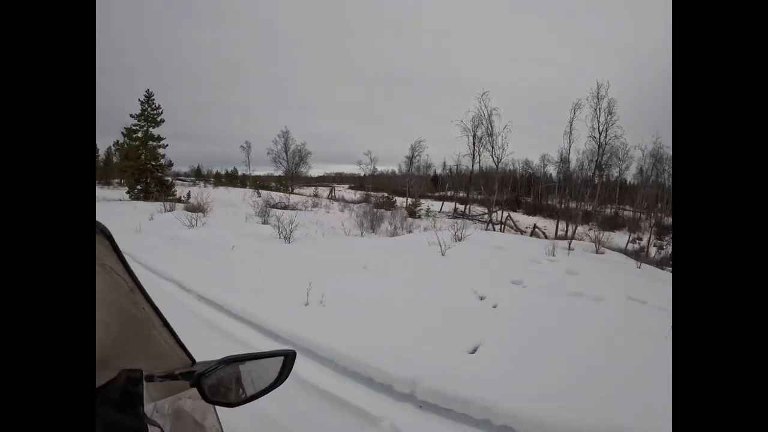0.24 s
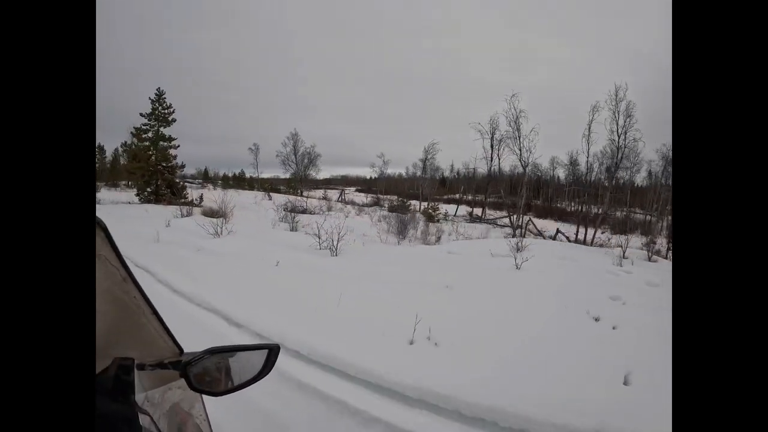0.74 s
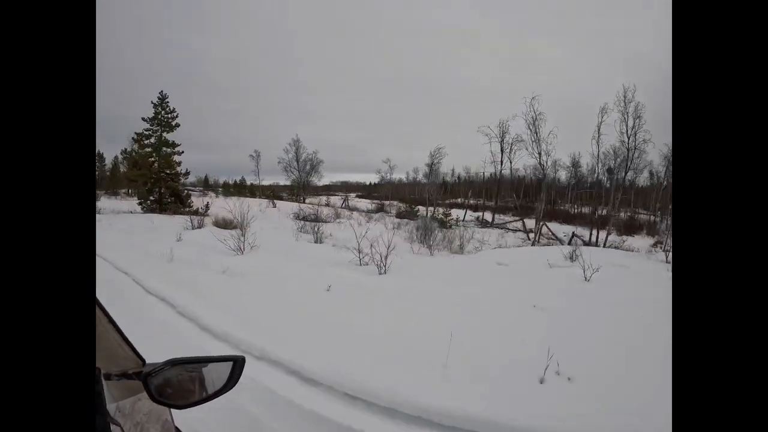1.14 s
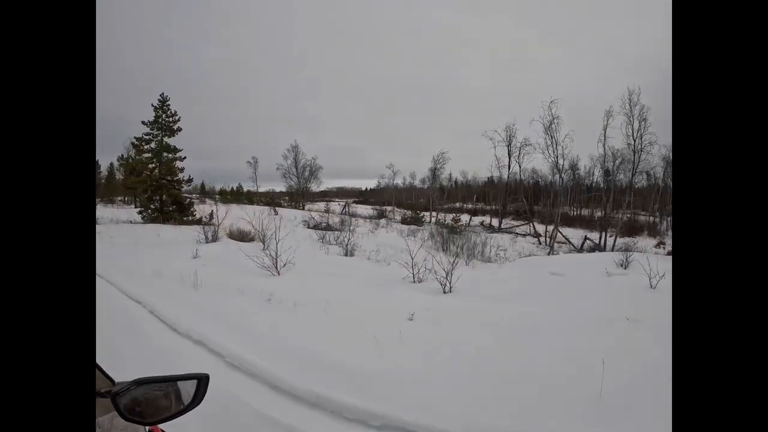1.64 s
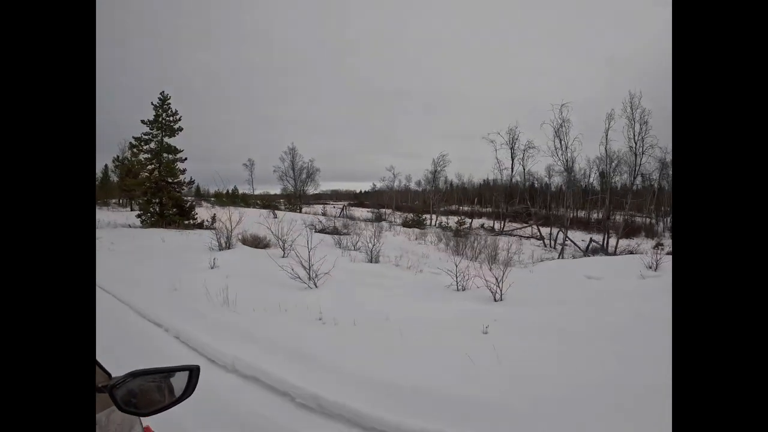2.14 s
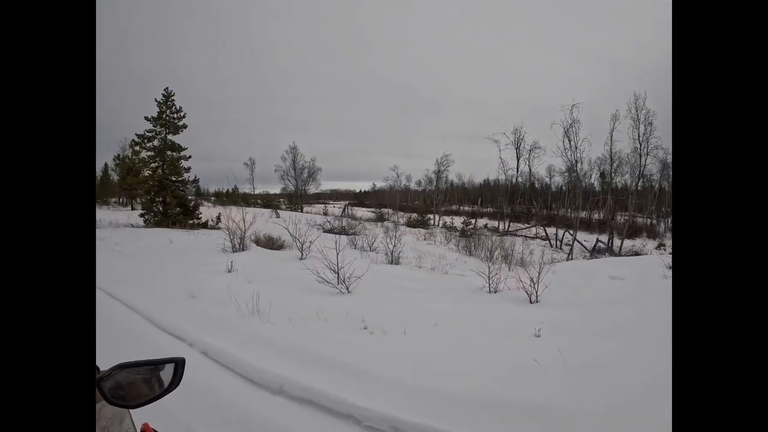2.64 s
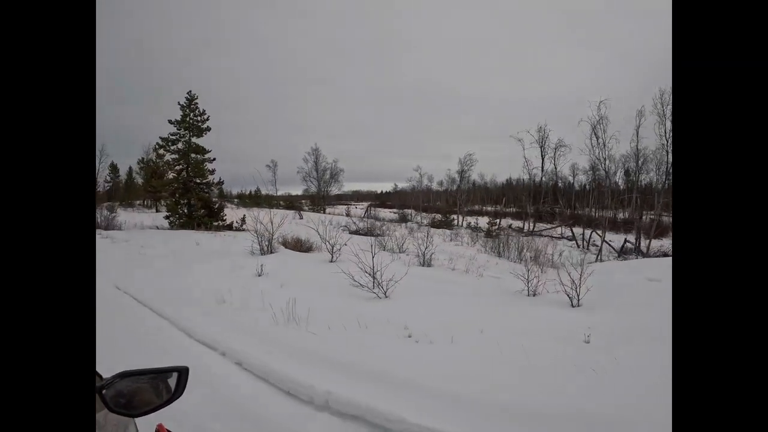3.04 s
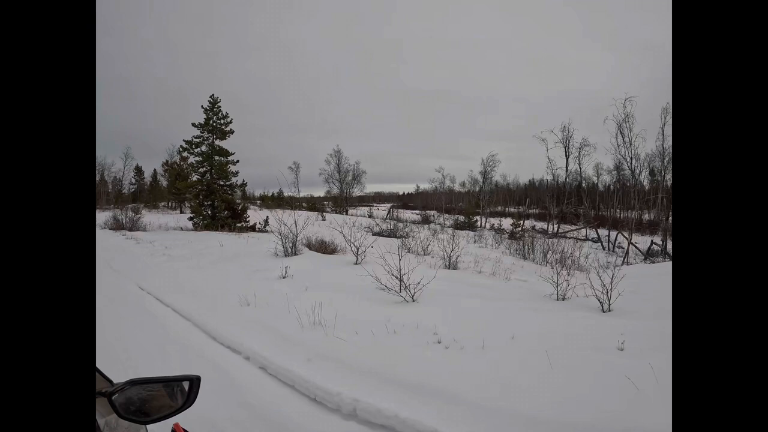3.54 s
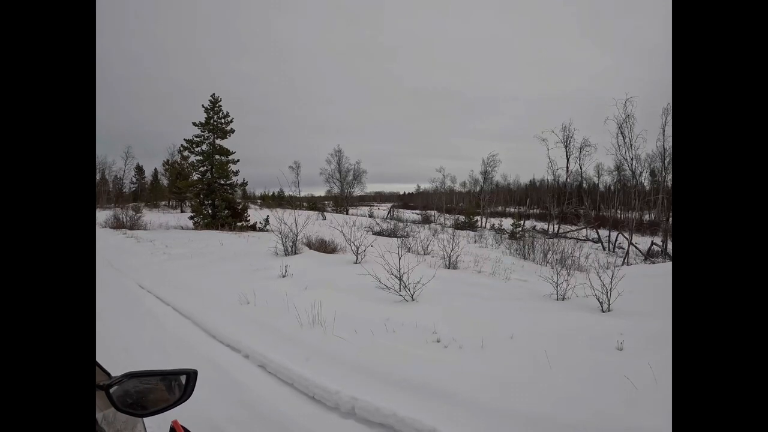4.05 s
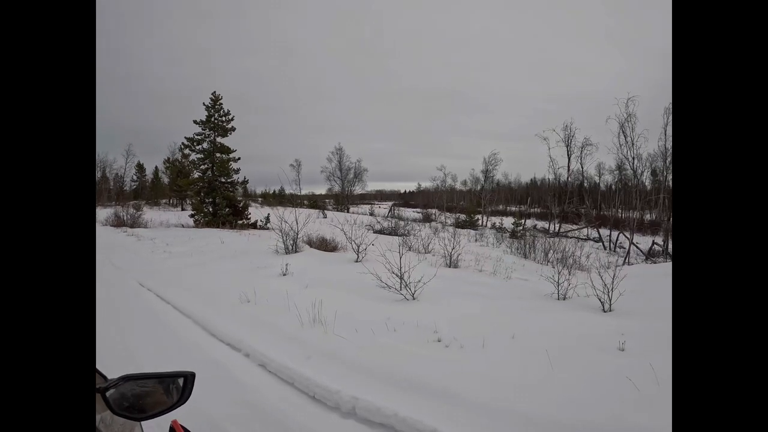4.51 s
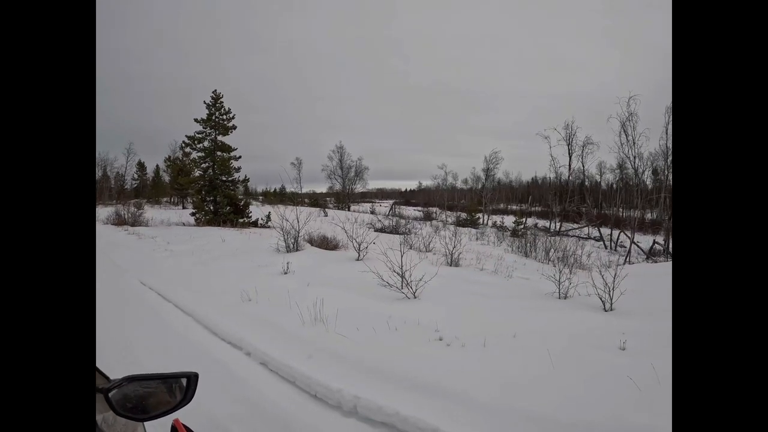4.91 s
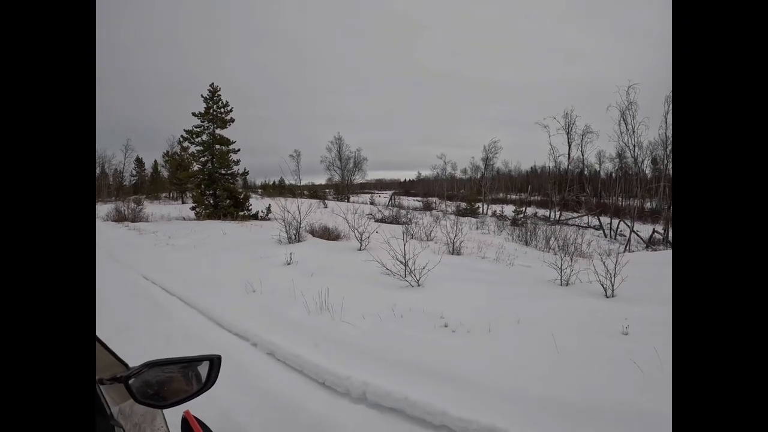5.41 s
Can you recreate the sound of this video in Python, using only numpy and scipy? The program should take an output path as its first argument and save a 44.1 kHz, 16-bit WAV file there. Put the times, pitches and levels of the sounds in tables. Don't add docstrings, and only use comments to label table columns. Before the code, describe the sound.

A snowmobile's raspy engine rises slightly, then its pitch falls as the throttle closes, with brief low wind buffeting. It settles into uneven chugging with block knocks and metallic clatter. A plastic switch clicks; the crank turns over ever more slowly, shaking small parts, and nearly silent outdoor air remains. The microphones are close, worn or mounted at the seat, dry with no echo.

```python
import sys
import numpy as np
from scipy import signal
from scipy.io import wavfile
from scipy.ndimage import uniform_filter1d

SR = 44100
rng = np.random.default_rng(int(sys.argv[2]) if len(sys.argv) > 2 else 0)


def attenuation_scalar(level_db):
    decades = np.asarray(level_db, float) / 20
    return 10 ** decades


def dump(signal):
    limited = np.clip(np.atleast_2d(signal).T, -1, 1)
    pcm = np.round(limited * 32767).astype(np.int16)
    wavfile.write(sys.argv[1], SR, pcm)


N = 250047
CUT_S = 4.806
IDLE_SPEED = 21
OPPOSITE = np.array([[1], [-1]])


def in_time(rows):
    s, *columns = np.transpose(rows)
    return [np.interp(np.arange(N) / SR, s, c) for c in columns]


def at_hz(points, hz):
    table_hz, values = np.transpose(points)
    return np.interp(np.log(hz), np.log(table_hz), values)


def rms_one(x):
    return x / np.sqrt(np.mean(x ** 2) + 1e-20)


def pan(left_db, right_db):
    return attenuation_scalar([[left_db], [right_db]])


def butter(x, hz, kind, order=2):
    return signal.sosfilt(signal.butter(order, hz, kind, fs=SR, output="sos"), x)


def drift(rate):
    r = np.exp(-80 * np.pi * rate / SR)
    slow = signal.lfilter([1], [1, -2 * r, r * r], rng.standard_normal(N // 40 + 2002))[2000:]
    return np.interp(np.arange(N) / 40, np.arange(len(slow)), rms_one(slow))


def resonate(x, modes):
    out = 0
    for k, (hz, width, db) in enumerate(modes):
        r = np.exp(-np.pi * width / SR)
        poles = [1, -2 * r * np.cos(2 * np.pi * hz / SR), r * r]
        zeros = np.array([1, 0, -1]) * (1 - r * r) / 2
        out = out + (-1) ** k * attenuation_scalar(db) * signal.lfilter(zeros, poles, x + 1e-18)
    return out


def swells(rows):
    t = np.arange(N, dtype=np.float32) / SR
    return sum(top * np.exp(-np.minimum(((t - s) / half) ** 2, 60)) for s, half, top in rows)


def loud_swells(rows, rest_db):
    return attenuation_scalar(rest_db) + swells([(s, half, attenuation_scalar(db)) for s, half, db in rows])


def place(out, s, sound):
    part = out[:, round(s * SR):][:, :sound.shape[1]]
    part += sound[:, :part.shape[1]]


def dead_s():
    return np.maximum(np.arange(N) / SR - CUT_S, 0)


def firing_speed():
    # (time [s], speed [turns per s])
    crank = [(0, 53.8), (.35, 53.8), (.52, 57.6), (.7, 58.8), (.99, 56.8), (1.15, 48.6), (1.3, 45.2),
             (1.66, 40.8), (1.82, 36.6), (2.13, 33.1), (2.33, 29.5), (2.78, 23.5), (3.15, 21.0),
             (3.57, 20.8), (3.7, 20.3), (4.04, 20.4), (4.16, 21.0), (4.82, 20.6)]
    return in_time(crank)[0]


def crank_turns():
    # (time [s], angle [turns])
    run_out = [(4.806, 0), (4.855, 1), (4.882, 1.5), (4.915, 2), (4.984, 3), (5.072, 4), (5.128, 4.5),
               (5.192, 5), (5.277, 5.5), (5.394, 6), (5.536, 6.5), (5.75, 7)]
    turns = np.cumsum(firing_speed() * (1 + 0.0025 * drift(9.3))) / SR
    return np.where(dead_s() > 0, in_time(run_out)[0], turns - turns[round(CUT_S * SR)])


def speed_of(turns):
    return uniform_filter1d(np.gradient(turns) * SR, size=800)


def idling():
    return np.clip((24 - firing_speed()) / 3, 0, 1) * (dead_s() == 0)


def coasting_share(load):
    return (1 - idling()) * (1 - load) * (dead_s() == 0)


def kicks(turns):
    kick_s, between_db = 0.045, -6
    away_s = np.abs((2 * turns + .5) % 1 - .5) / 2 / speed_of(turns)
    opened = np.maximum(np.exp(-(away_s / kick_s) ** 3), attenuation_scalar(between_db))
    return np.where(dead_s() > 0, opened, 1)


def engine(turns):
    # (time [s], load [0-1], exhaust push [dB], imbalance of the cylinders [dB])
    riding = [(0, 0.35, -22.5, 22.5), (.2, 0.16, -31, 29.5), (.4, 0.69, -23, 22), (.8, 0.81, -24.5, -26),
              (.98, 0.97, -22.5, 17), (1.07, 0.98, -34, -5), (1.17, 0.28, -20.5, 7.5),
              (1.55, 0.01, -21.5, 17.5), (1.78, 0.07, -23.5, 12.5), (2.3, 0.08, -24.5, -3),
              (2.7, 0, -24, -8), (3.0, 0.17, -17.5, 3), (4.78, 0.23, -17, -3.5), (4.9, 0.12, -17.5, -18),
              (5.02, 0.05, -19, -1), (5.29, 0.03, -16.5, -26), (5.5, 0.56, -29.5, -11),
              (5.67, 0.2, -43, .3)]
    load, push_db, odd_db = in_time(riding)
    pulses = firings(turns, load, odd_db)
    pipes = exhaust_push(pulses, load, push_db) + intake_bark(pulses)
    return pipes + hood_hum(pulses) + drive_whine(turns) + pipe_crossings(turns)


def firings(turns, load, odd_db):
    order_db = [-20, -2.5, 9.5, -19.5, 7.5, -1, -30, 10, 10, 24, -22.5, 13]
    coasting_db = {10: -0.5, 12: 1.5, 14: 4.1}
    idle_odd_db = -27
    compression_hz, spark_dies_s = 313, 0.23
    even_db, part_load_db = 1.36, -0.4

    speed, pulses = speed_of(turns), 0
    top_order = np.maximum(120 * np.exp(-dead_s() / spark_dies_s), np.minimum(compression_hz / speed, 34))
    spread_db = (even_db + part_load_db * 4 * load * (1 - load)) * (dead_s() == 0)
    wander = [.9 * (1 - idling()) * (1 - .7 * load) * drift(8) for _ in range(5)]
    coasting = coasting_share(load)
    for k in range(1, 35):
        pull_db = order_db[min(k, len(order_db)) - 1]
        db = load * pull_db + (1 - load) * (idle_odd_db + odd_db) * (k % 2)
        db = db + coasting_db.get(k, 0) * coasting
        phase = 2 * np.pi * k * turns + (wander[k % 5] if k > 4 else 0)
        pulses = pulses + attenuation_scalar(db) * np.exp(-(k / top_order) ** 2) * np.cos(phase)
    strength = np.interp((2 * turns) % 599, np.arange(600), rng.standard_normal(600))
    return pulses * np.sqrt(2) * speed / 21 * attenuation_scalar(spread_db * strength)


def exhaust_push(pulses, load, push_db):
    # (frequency [Hz], width [Hz], level [dB])
    exhaust_modes = [(43.5, 40, -3.5), (73, 15.5, 2.5), (113.3, 14.7, -1.3)]
    # (frequency [Hz], width [Hz], level [dB])
    side_pipe = [(148.4, 24.6, -11)]
    frame_db = push_db - 3.5 * idling() + 2 * dead_s()
    frame = resonate(pulses * attenuation_scalar(frame_db), [(68.6, 6.6, 2.65)])
    push = butter(resonate(pulses * attenuation_scalar(push_db), exhaust_modes) - frame, 167, "low")
    return push - resonate(pulses * attenuation_scalar(push_db) * coasting_share(load), side_pipe)


def intake_bark(pulses):
    # (frequency [Hz], width [Hz], level [dB])
    intake_modes = [(196.7, 83, -11.5), (197.5, 116, -10), (296.7, 28, -6), (332.3, 14.8, -10.5),
                    (389.3, 49.7, -13.5), (470.3, 28.4, -16.5)]
    # (time [s], half length [s], level [dB])
    throttle_shut = [
        (1.12, 0.2, -6),
        (2.25, .22, -6),
    ]
    lead_s, fade_db_per_s = .0019, 50
    bark_db = -24.5 + swells(throttle_shut) - fade_db_per_s * np.maximum(dead_s() - .2, 0)
    early = np.roll(pulses, -round(lead_s * SR))
    bark = butter(resonate(-early * attenuation_scalar(bark_db), intake_modes), 550, "low", order=6)
    return bark * pan(-0.47, 0.47)


def hood_hum(pulses):
    # (time [s], half length [s], level [dB])
    low_panel = [
        (.14, 0.12, -35.5),
        (.36, 0.12, -40.5),
        (1.27, 0.18, -38),
    ]
    hood = [(645, 60, 0)]
    driven = pulses * loud_swells(low_panel, -75)
    return resonate(resonate(driven, hood), hood) * pan(-9.0, -13.0)


def drive_whine(turns):
    # (crank order [1], level [dB])
    drive_tones = [(3, -27), (16, -43), (18, -37.5), (20, -43), (22, -49), (24, -50), (26, -46.5),
                   (30, -57.5), (34, -58), (38, -50.5), (40, -52.5)]
    top_speed, db_per_speed = 59.1, 2
    whine = 0
    for k, db in drive_tones:
        side = pan(4.0, -2.0) if k > 8 else 1
        whine = whine + attenuation_scalar(db + 2.5 * drift(15)) * np.sin(2 * np.pi * k * turns) * side
    below = np.maximum(top_speed - uniform_filter1d(firing_speed(), size=2000), 0)
    return whine * (attenuation_scalar(5 - db_per_speed * below) + attenuation_scalar(-5 - 2.4 * below))


def pipe_crossings(turns):
    # (crank order [1], time [s], half length [s], level [dB])
    order_swells = [(12.06, 1.8, .14, -37), (13.98, 2.07, 0.1, -33), (14, 2.3, .12, -33.5),
                    (5.98, 2.7, 0.15, -32), (15.97, 2.39, 0.087, -33.5), (18, 2.65, 0.089, -34.5),
                    (8, 2.95, 0.11, -34), (22.04, .2, .2, -46), (25.94, .25, 0.22, -48)]
    waver, out = .5 * drift(8), 0
    for k, s, half, db in order_swells:
        tone = np.sqrt(2) * np.sin(2 * np.pi * k * turns + waver)
        out = out + swells([(s, half, attenuation_scalar(db))]) * tone
    return out


def clatter(turns):
    # (frequency [Hz], density [dB per Hz])
    colour = [(280, -31), (480, -1), (531, 2), (677, -5), (1170, 0), (1290, -6), (1490, -9), (2020, -3.5),
              (2170, -12.5), (3430, -16), (5500, -23.5), (7550, -27.5), (14800, -68.5)]
    # (frequency [Hz], left minus right [dB])
    left_db = [(60, 0.0), (110, 0.0), (200, 0.0), (370, -7), (680, 7.5), (1260, 4.5), (2310, 10.5),
               (4250, 0.5), (7810, 7), (14400, 24.5)]
    # (frequency [Hz], likeness [0-1])
    likeness = [(60, 1.0), (130, 1.0), (290, 0.67), (630, 1), (1370, 0.84), (3000, 1), (6570, 0.65),
                (14400, 0.27)]
    # (frequency [Hz], width [Hz], level [dB])
    panel_modes = [(969, 18, -4.5), (1210, 210, -18.5), (1750, 62, -16.5), (2047, 70, -16.5),
                   (2530, 320, -36.5), (3420, 150, -30), (4130, 190, -41), (5030, 120, -38.5)]
    lag_s, full_coast = .003, 14

    speed, late = firing_speed(), turns - lag_s * speed_of(turns)
    coasting = uniform_filter1d(np.clip(-np.gradient(speed) * SR / full_coast, 0, 1), size=9000)
    level_db = -39 + 6 * np.log2(speed_of(turns) / IDLE_SPEED) - 2 * coasting
    level_db = level_db + 1.5 * np.clip((speed - 54) / 3, 0, 1)
    bright_db = 0.6 - 1.14 * coasting + 2.5 * dead_s()

    slow = np.clip((30 - speed) / 9, 0, 1) * np.exp(-dead_s() / .15)
    even = .8 + (.62 - .8) * slow
    burst = .65 + (1.05 - .65) * slow
    stronger = 1 - .5 * np.sin(2 * np.pi * late)
    gate = even + burst * stronger * uniform_filter1d(np.exp(-(2 * late % 1) * 2.5), size=330)

    white, edges, bands = rng.standard_normal((2, 2, N)), 480 * 2 ** np.arange(0, 5.1, .5), 0
    for k, (low, high) in enumerate(zip(edges, edges[1:])):
        hz = np.sqrt(low * high)
        near, apart = butter(white[k % 2], [low, high], "band")
        stray = np.sqrt(np.clip(1 - at_hz(likeness, hz), 0, 1) / 2) * apart * OPPOSITE
        side = attenuation_scalar(at_hz(left_db, hz) / 2 * OPPOSITE)
        dull_db = -2 * slow * (hz < 900)
        gain = attenuation_scalar(at_hz(colour, hz) + bright_db * np.log2(hz / 1200) + dull_db + 0.97 * drift(21))
        bands = bands + gain * (near + stray) * side * gate ** (.9 if hz > 4000 else 1.1)
    panels = resonate(white[0, 0] * gate ** 2 + .3 * white[1], panel_modes) * pan(9.0, 3.5)
    knock = block_knock(late, slow, white[1, 1])
    return attenuation_scalar(level_db) * kicks(turns) * (rms_one(bands + panels) + knock)


def block_knock(late, slow, chance):
    # (frequency [Hz], width [Hz], level [dB])
    block_modes = [(960, 90, -21), (1265, 55, -11), (1720, 120, -23), (2010, 110, -23), (2550, 250, -33),
                   (3450, 250, -35), (4600, 400, -44)]
    apart = 35
    half_turn = np.floor(2 * late - .1)
    blow_db = 58 - 6 * (1 - half_turn % 2) - 6 * (1 - slow) + 1.5 * chance
    blows = (np.diff(half_turn, prepend=half_turn[0]) > 0) * attenuation_scalar(blow_db)
    blows = (blows + np.roll(blows, apart) + np.roll(blows, 2 * apart)) / 2.6
    return resonate(blows * np.exp(-dead_s() / .25), block_modes) * pan(2.5, -3.0)


def chassis(turns):
    # (time [s], half
    # length [s], level [dB], frequency [Hz])
    bumps = [(0, 0.015, -13.5, 61), (0.105, 0.033, -18, 57.7), (0.187, 0.043, -19, 75),
             (0.239, 0.048, -14.5, 54.5), (0.351, 0.033, -17.5, 70), (0.654, 0.026, -27, 56),
             (0.765, 0.027, -21, 78.4), (0.856, .04, -27, 65), (0.971, 0.024, -17, 85),
             (1.054, 0.045, -17, 69.5), (1.153, .04, -18.5, 73), (1.216, .03, -21, 68.4),
             (1.415, 0.06, -30, 58), (1.549, 0.056, -28, 55), (5.402, 0.011, -32, 206),
             (5.43, 0.026, -35.5, 133), (5.515, 0.011, -37, 237), (5.548, 0.0092, -37.5, 171),
             (5.585, .012, -42, 139), (5.55, 0.033, -25.5, 42), (5.621, 0.03, -37, 45.5)]
    t, jolts = np.arange(N) / SR, 0
    for s, half, db, hz in bumps:
        jolts = jolts + np.sqrt(2) * swells([(s, half, attenuation_scalar(db))]) * np.cos(2 * np.pi * hz * (t - s))

    boom = resonate(rng.standard_normal(N), [(29.8, 5.6, 1.5), (63.0, 43.0, 11)])
    boom_db = -40 + 15.5 * np.clip((2 - t) / .4, 0, 1) - 8.2 * dead_s()
    boom = attenuation_scalar(boom_db) * rms_one(butter(boom, 110, "low"))

    drone_db = -33.5 + 6 * np.log2(speed_of(turns) / IDLE_SPEED) + 2.5 * idling()
    drone_db = drone_db + 4 * np.minimum(dead_s() / 0.21, 1)
    unlike = butter(rng.standard_normal(N), 390, "high", order=6) * OPPOSITE
    white = rng.standard_normal(N) + .2 * unlike
    modes = [(30, 21, -22.5), (99, 25, -20.0), (164.0, 97.0, 3.0), (298.0, 60, 2.5), (420, 108, -2.0)]
    drone = rms_one(butter(resonate(white, modes), 441, "low", order=6))
    return jolts + boom + attenuation_scalar(drone_db) * kicks(turns) * drone


def crank_tick(turns):
    swell_speed, speed_range, swell_db = 38.8, 7.8, 9
    angle = turns + .78
    chance = rng.standard_normal(300)[np.floor(angle).astype(int) % 300]
    since_s = (angle % 1) / firing_speed()
    near_speed = np.exp(-((speed_of(turns) - swell_speed) / speed_range) ** 4)
    tick_db = -57 + swell_db * near_speed - 40 * dead_s()
    burst = np.exp(-since_s / .0011) * attenuation_scalar(tick_db + 14 + 1.2 * chance)
    modes = [(3220, 490, 3.5), (6500, 3600, -29.5), (9400, 350, -2.5)]
    near, apart = resonate(rng.standard_normal((2, N)), modes)
    tick = burst * rms_one(near + .5 * apart * OPPOSITE)
    return butter(tick, 8100, "low", order=4) * pan(2.0, -2.0)


def singing_panel():
    # (time [s], half length [s], level [dB])
    high_panel = [
        (.01, .025, -41),
        (.075, .03, -41),
        (.2, .075, -39.5),
        (.55, .12, -45),
        (.9, .17, -45),
        (1.53, .08, -42),
        (1.72, .1, -46),
    ]
    mode = [(1965, 44, 0)]
    whistle = rms_one(resonate(resonate(rng.standard_normal(N), mode), mode))
    return loud_swells(high_panel, -62) * np.exp(-dead_s() / .1) * whistle * pan(3.0, -3.0)


def valve_hiss(turns):
    since_s = (turns + .5) % 1 / IDLE_SPEED
    hiss = rms_one(resonate(rng.standard_normal(N), [(10200, 250, 0)]))
    return attenuation_scalar(-70) * idling() * np.exp(-(since_s / .011) ** 2) * hiss * pan(2.0, -2.0)


def rattle(turns):
    knocks_per_s, rise_s, fade_db_per_s = 700, 0.2, 26
    level = attenuation_scalar(-43 - fade_db_per_s * dead_s()) * np.minimum(dead_s() / rise_s, 1) * kicks(turns)
    strength = attenuation_scalar(4.0 * np.minimum(rng.exponential(size=N), 2.5))
    knocks = (rng.random(N) < knocks_per_s / SR) * strength * level
    dealt, pitches = rng.integers(0, 12, N), np.geomspace(700, 3400, 12)
    rings = sum(resonate(knocks * (dealt == k), [(hz, 260, 30)]) for k, hz in enumerate(pitches))
    return butter(rings, 3500, "low") * pan(2.5, -2.5)


def switch_click():
    # (time [s], peak level [dB])
    snaps = [
        (4.7864, -26),
        (4.7875, -12),
        (4.7894, -19.5),
        (4.7908, -13.5),
    ]
    # (frequency [Hz], width [Hz], level [dB])
    case_modes = [(1080, 190, 0.5), (1314, 250, -3), (1640, 210, 1.5), (2130, 120, 4), (2500, 240, 0),
                  (3300, 280, 1), (3900, 260, 1), (4730, 500, -4.5), (6100, 390, -4), (7000, 1100, -8.5),
                  (9400, 1300, -21)]
    out, t = np.zeros((2, N)), np.arange(4000) / SR
    for s, db in snaps:
        snap = resonate(rng.standard_normal(4000) * np.exp(-t / .0005), case_modes)
        place(out, s, attenuation_scalar(db) * snap / np.abs(snap).max() * pan(2.0, -2.0))
    return out


def metal_clinks():
    # (time [s], peak level [dB], frequency [Hz], left minus right [dB])
    clinks = [(4.93, -42, 2350, 4), (4.967, -34, 1410, 6), (5.052, -40, 2230, 6), (5.285, -44, 3150, 4),
              (5.314, -46, 1400, 3), (4.964, -23, 300, 0), (5.004, -39, 1650, 6), (5.008, -40, 2250, 6),
              (5.092, -36, 1570, 7), (5.172, -36, 950, 6), (5.14, -41, 2200, 6), (5.205, -42, 2100, 6),
              (5.254, -40, 1100, 6), (5.29, -42, 1800, 5), (5.228, -42, 1600, 6), (5.272, -48, 3150, 4),
              (5.364, -45, 1280, 4), (5.438, -53, 1030, 5), (5.368, -48, 2070, 15), (5.395, -42, 2000, 5),
              (5.414, -45, 2780, 8), (5.545, -47, 2260, 8), (5.547, -50, 1350, 5), (5.576, -51, 1040, -11),
              (5.619, -51, 2180, 9), (5.622, -50, 1160, 5)]
    # (time [s], peak level [dB])
    ring_touches = [
        (5.007, -35),
        (5.05, -49),
        (5.098, -39),
        (5.155, -37),
        (5.226, -36),
        (5.252, -50),
        (5.366, -48),
    ]
    bounce_s, bounce_db, bounce_hz = .007, -11, 60
    touches = [(s + k * bounce_s, db + 3.5 + k * bounce_db, 4025 + k * bounce_hz, 3.2)
               for s, db in ring_touches for k in range(2)]
    out, t = np.zeros((2, N)), np.arange(4000) / SR
    for s, db, hz, pan_db in clinks + touches:
        clink = np.sin(2 * np.pi * hz * t) * np.exp(-t / 0.0056) * np.minimum(t / 0.004, 1)
        place(out, s, attenuation_scalar(db) * clink * pan(pan_db / 2, -pan_db / 2))
    return out


def cloth_scuffs():
    # (time [s], level [dB], length [s])
    rubs = [
        (4.986, -58, 0.015),
        (5.216, -53.5, 0.011),
        (5.242, -51, 0.034),
        (5.362, -63, 0.026),
        (5.398, -54, 0.012),
        (5.479, -42.5, 0.0095),
        (5.49, -43, 0.039),
        (5.578, -60, 0.21),
    ]
    out, t = np.zeros((2, N)), np.arange(4000) / SR
    for s, db, length in rubs:
        mid, side = butter(rng.standard_normal((2, 4000)), [400, 8000], "band", order=3)
        shape = np.minimum(t / 0.0021, 1) * np.exp(-(t / length) ** 2)
        place(out, s, attenuation_scalar(db) * shape * (mid + 0.3 * side * OPPOSITE))
    return out


def wind():
    # (time [s], half length [s], level [dB])
    gusts = [(.92, 0.055, -43), (1.1, .07, -29), (1.22, 0.086, -37), (1.37, 0.042, -27), (1.5, 0.077, -45),
             (1.6, .03, -49), (1.93, .02, -50), (4.36, .02, -56), (5.28, 0.017, -57), (5.4, 0.04, -64),
             (5.58, 0.054, -47)]
    rumble = rms_one(butter(rng.standard_normal(N), 90, "low", order=1))
    lumps = attenuation_scalar(-7 * drift(25))
    return loud_swells(gusts, -94) * lumps * butter(rumble, 900, "low") * OPPOSITE


def still_air():
    return attenuation_scalar(-69) * rms_one(butter(rng.standard_normal((2, N)), [200, 3000], "band"))


def scene():
    turns = crank_turns()
    machine = engine(turns) + clatter(turns) + chassis(turns)
    machine = machine + crank_tick(turns) + singing_panel() + valve_hiss(turns)
    small_parts = rattle(turns) + switch_click() + metal_clinks() + cloth_scuffs()
    return machine + small_parts + wind() + still_air()


def band_limit(x):
    return signal.sosfilt(signal.butter(12, 14960, fs=SR, output="sos"), x)


def record(dry):
    heard = butter(dry, 11.0, "high", order=1)
    return band_limit(heard)


dry = scene()
out = record(dry)
dump(out)
```